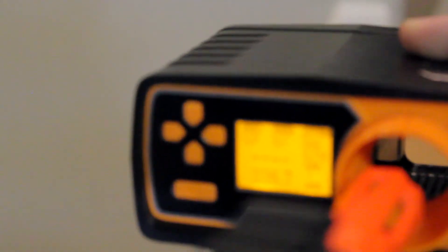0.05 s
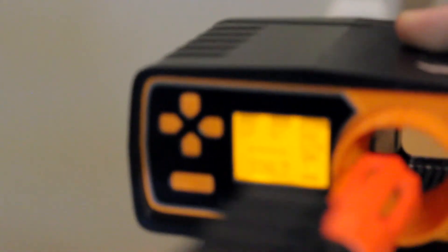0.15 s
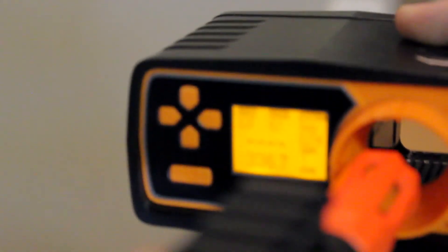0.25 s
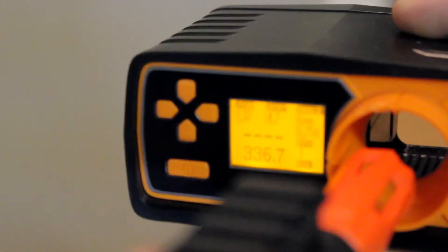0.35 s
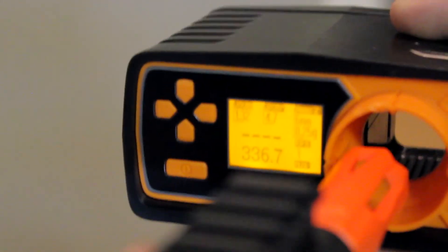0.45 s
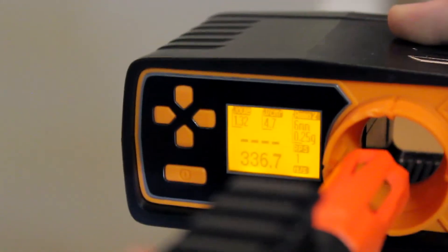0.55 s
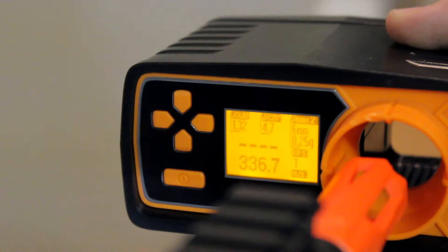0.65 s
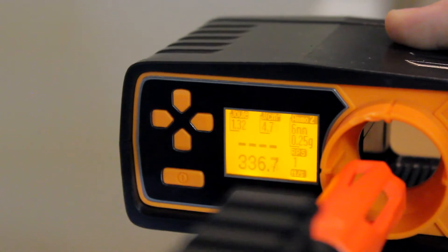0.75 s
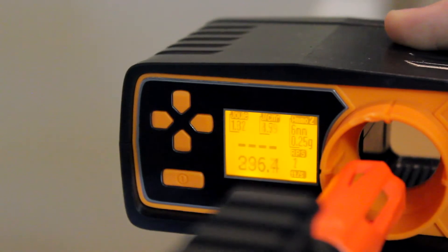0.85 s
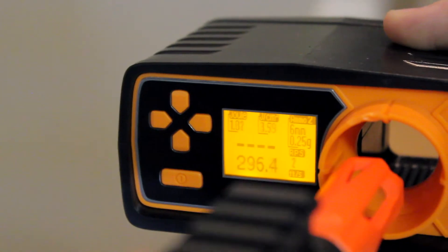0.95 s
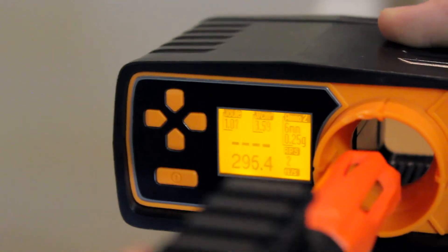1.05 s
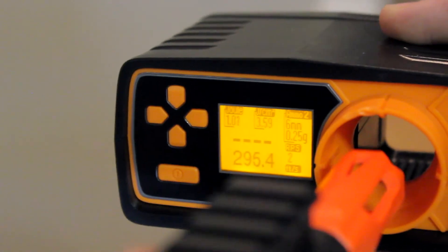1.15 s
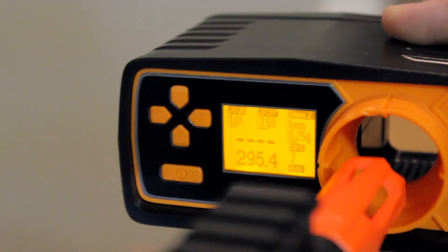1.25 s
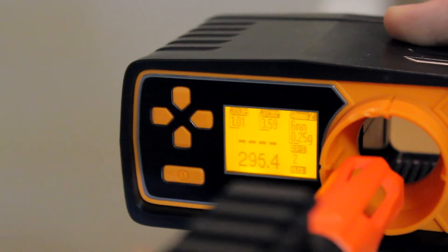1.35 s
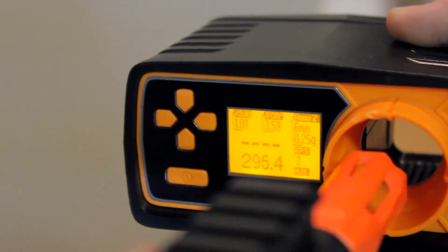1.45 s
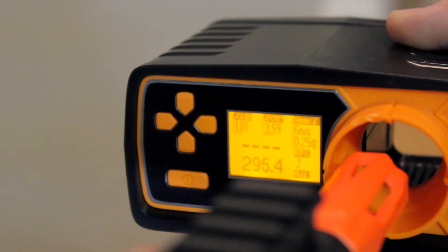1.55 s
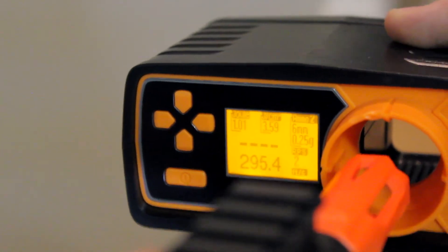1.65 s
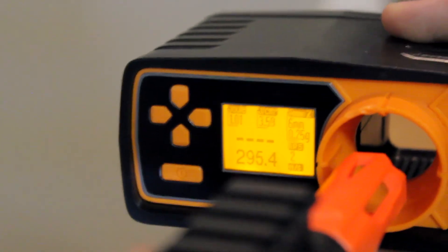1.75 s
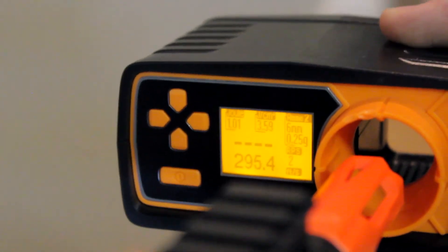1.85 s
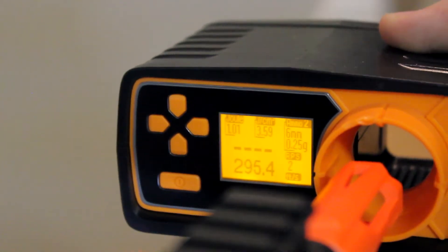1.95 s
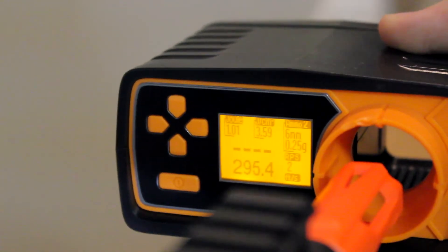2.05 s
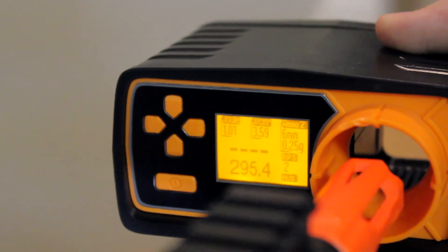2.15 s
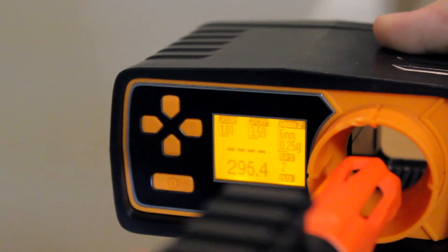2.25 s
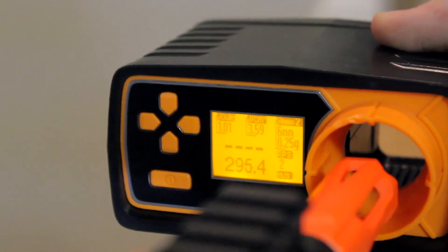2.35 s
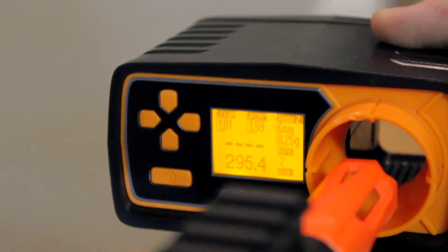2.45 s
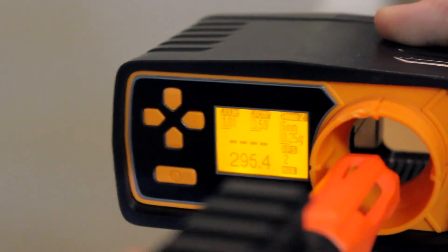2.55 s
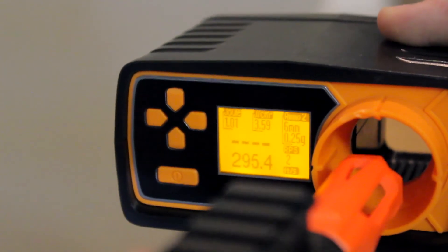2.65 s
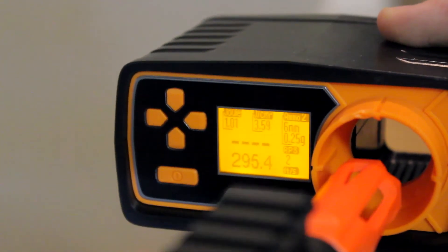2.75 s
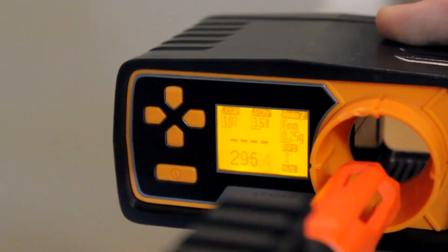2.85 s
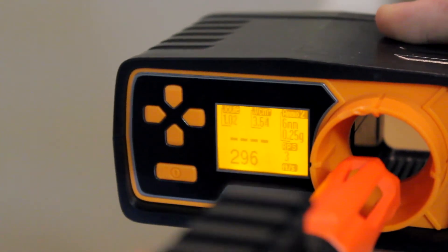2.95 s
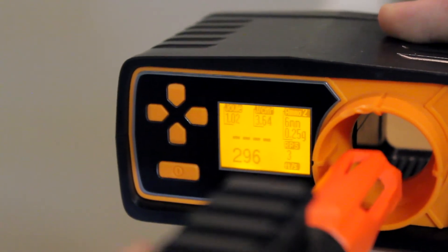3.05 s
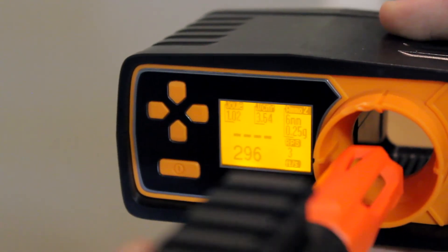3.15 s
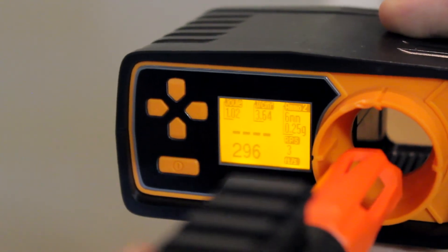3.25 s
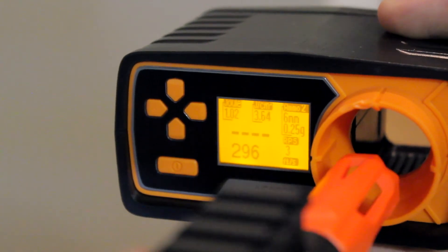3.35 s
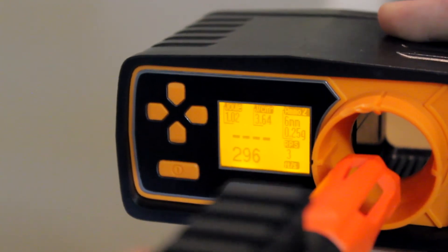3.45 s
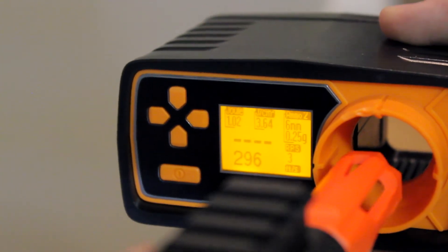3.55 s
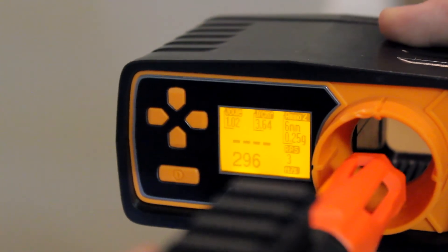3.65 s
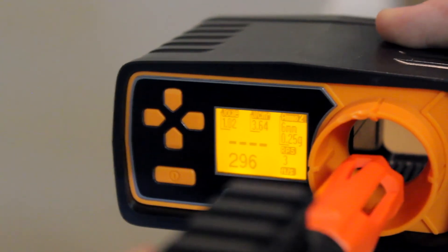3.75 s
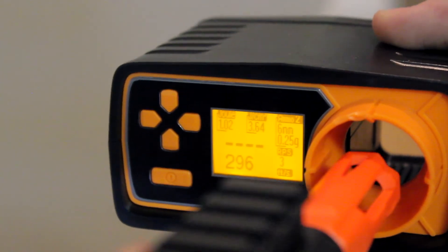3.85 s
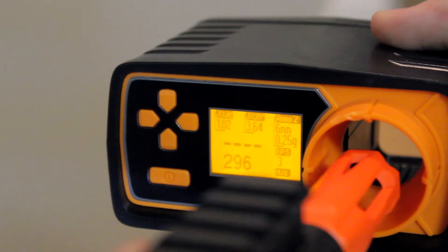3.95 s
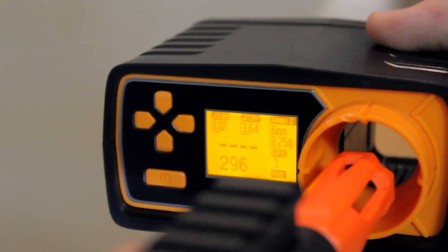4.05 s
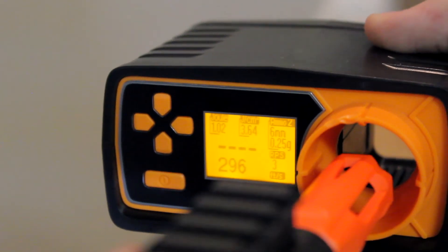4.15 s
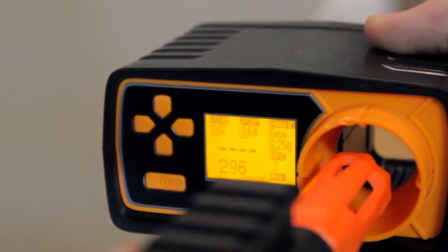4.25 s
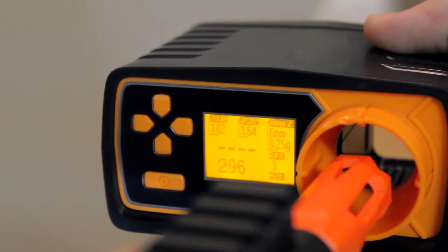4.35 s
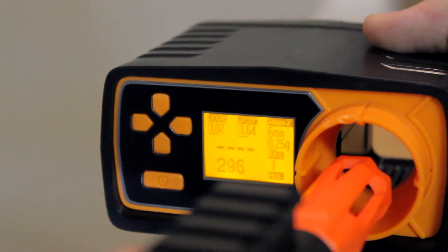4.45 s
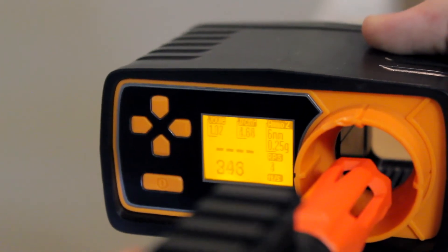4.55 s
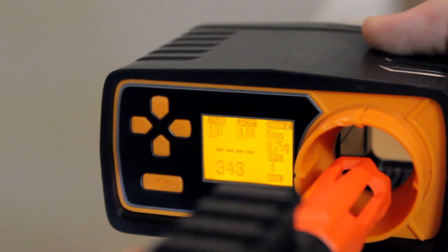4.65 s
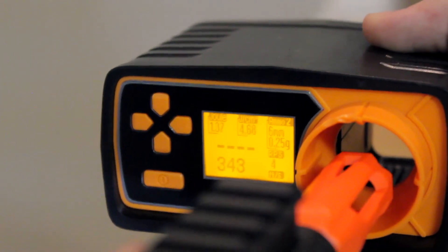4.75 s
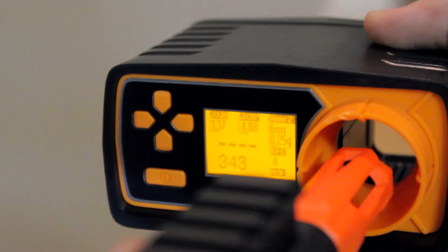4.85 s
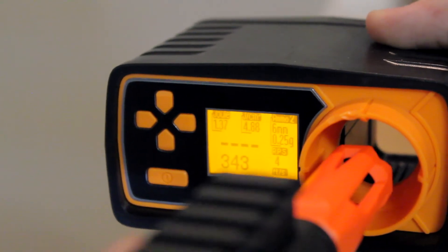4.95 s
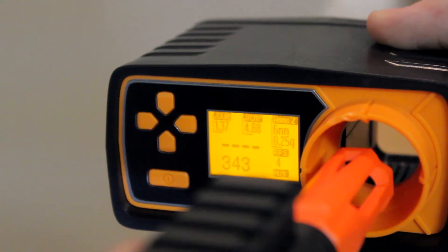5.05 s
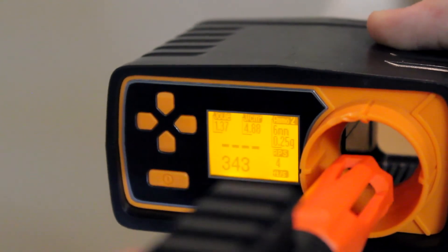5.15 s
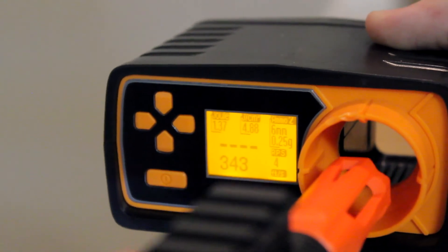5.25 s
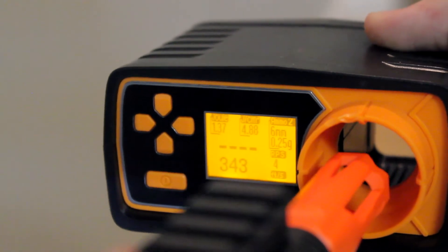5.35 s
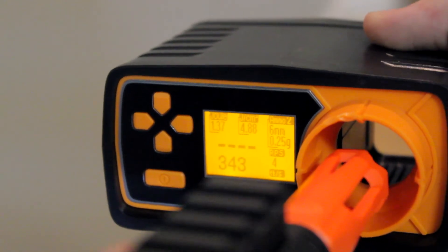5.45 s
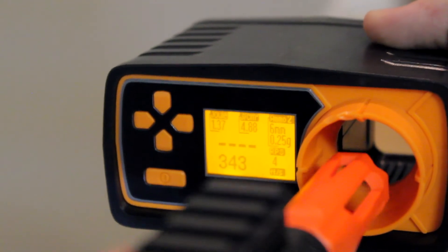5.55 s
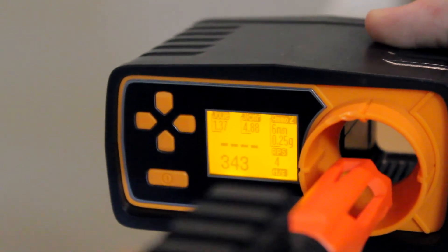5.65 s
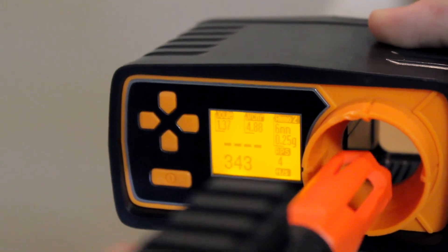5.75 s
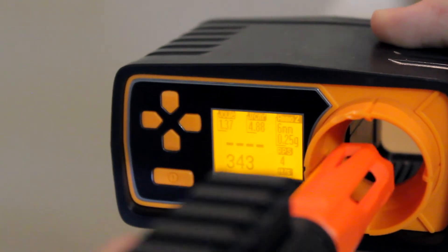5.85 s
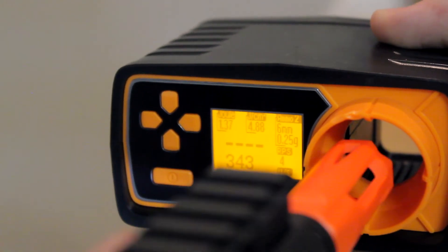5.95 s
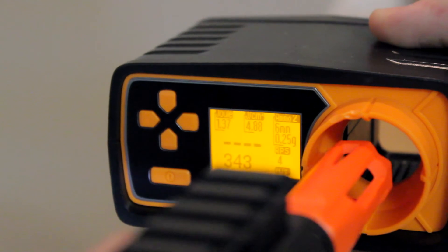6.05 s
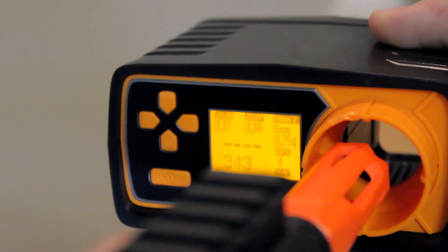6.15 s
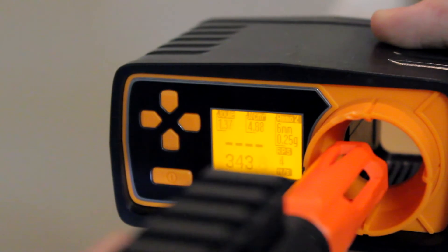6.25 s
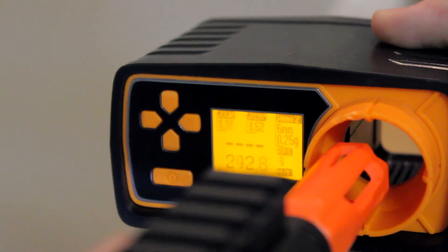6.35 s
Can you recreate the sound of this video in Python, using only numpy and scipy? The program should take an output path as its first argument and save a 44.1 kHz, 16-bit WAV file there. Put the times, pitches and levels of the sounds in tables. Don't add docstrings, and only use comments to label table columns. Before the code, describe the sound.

Quiet hiss and low hum open the scene, with barely audible hand movement. At about 0.62 s an electric toy rifle, close and right of centre, fires: a rapid gear whine, a thump and hard metallic-plastic piston clack at 0.66, a pellet smacking a target at 0.70, then clattering gears coasting down until about 0.9. A softer knock falls at 0.79. The loose pellet bounces at 1.2, 1.5, strongly at 1.73 with a glancing scrape, then fainter at 1.95 and 2.3. The second shot comes at 2.6, its hit at 2.69, with a faint knock at 2.89. Light rustling follows around 3.1 to 3.4. The third shot cracks at 4.4, again with a quick hit and a faint later knock. Hands rustle from 4.9 to 6.0, with a tiny tap at 5.72. The fourth shot fires at 6.2, hits at 6.25, and its gears are running down as it ends. Room echo is short, about half a second.

```python
import sys
import numpy as np
from scipy import signal
from scipy.fft import rfft, irfft
from scipy.io import wavfile
from scipy.ndimage import uniform_filter1d

SR = 44100
rng = np.random.default_rng(int(sys.argv[2]) if len(sys.argv) > 2 else 0)


def dump_mix(stems):
    frames = np.atleast_2d(stems).T
    limited = np.clip(frames, -1, 1)
    pcm = np.round(limited * 32767).astype(np.int16)
    wavfile.write(sys.argv[1], SR, pcm)


def magnitude_from_level(level_db):
    exponent = np.asarray(level_db, float) / 20
    return 10 ** exponent


N = 282323

# f/Hz, density/dB
HISS_MID = [(40, -45.5), (70, -14.5), (123, -6), (150, -15), (300, -15.5), (420, -18), (540, -17),
            (700, -18.5), (1500, -22.5), (3000, -25.5), (6000, -27.5), (10000, -32.5), (13000, -36),
            (15600, -40)]
HISS_SIDE = [(18, -41.5), (30, -8), (95, -5), (140, -4.5), (263, -4), (623, -6.5), (674, -6), (1260, -9),
             (1560, -11), (3160, -13), (15600, -29)]
HISS_MID_DB, HISS_SIDE_DB = -60, -56.5
# f/Hz, level/dB, waver/dB
HUM = [(39.5, -71.5, 0.92), (125.54, -68.5, 0.5), (546, -73.5, 1.5), (714.6, -80, 4)]

# loudest t/s, fade per 20 dB/s, scratch
# level/dB, bump level/dB
HANDS = [(0.004, 0.0781, -62, -48), (0.27, 0.47, -66.5, -79), (1.06, 0.13, -58, -58),
         (1.166, .05, -68, -59), (2.41, 0.01, -68, -56), (3.1, 0.1446, -59, -58), (3.24, 0.0036, -60, -62),
         (3.413, .03, -57, -63), (3.67, 0.09, -68, -60), (4.9, 0.1952, -60, -68), (4.99, .16, -56, -64),
         (5.11, 0.13, -66, -58), (5.352, 0.1365, -51, -54), (5.715, .06, -61, -53), (5.978, .1, -65, -59)]
HAND_RISE = .45
# t/s, peak level/dB
TAP = [
    (5.7164, -50.5),
]

# f/Hz, width/Hz, level/dB
CASE = [(1250, 16.4, 6.5), (1663, 49, -11.5), (2604, 94, -3)]
RING = [(1965, 490, -2.5), (2613, 130, 1), (3067, 490, -3.5), (3963, 230, 2), (4237, 370, -2.5),
        (5524, 1400, -10)]
SHELL = [(538, 170, -2), (883, 89, -2.5), (1029.4, 68, 0.32), (1326, 220, 1.5), (1511, 460, -3)]
STOCK = [(117, 78, -11.5), (160.4, 25, -3), (237.95, 34, -3), (338.2, 49, 3), (392, 69, 3.5),
         (527, 140, -4.5)]
AIR = [(6580, 1200, 3.5), (8564, 5900, -2.5), (10813, 2400, -9.5), (12080, 4300, -17)]
# low f/Hz, high f/Hz
PART_EDGES = [
    (1620, 12000),
    (451, 2000),
    (70, 380),
    (4970, 13500),
]

# trigger t/s, piston home t/s, power cut t/s, winding level/dB, coasting level/dB
SHOTS = [
    (0.622, 0.658, 0.817, -15, -31),
    (2.583, 2.648, 2.8182, -15.5, -33),
    (4.357, 4.396, 4.5566, -17, -31),
    (6.142, 6.206, 6.385, -15.5, -31),
]
STAGE = {"bite": (4, -19.5, -16.5), "wind": (-10.5, -30, -13), "load": (-9.5, -10.5, -10.5),
         "recoil": (-4.5, -11, -8.5), "settle": (-10, -11, -10), "coast": (-.5, .8, -10.5),
         "rundown": (-5.5, -10, -10)}
MESH_START_HZ, MESH_TOP_HZ, SPIN_UP_S = 500, 2560, .026
TOUCH_DB, BITE_S, BITE_DB, WIND_UP_S = -47, .010, -25.5, .03
LOAD_S, LOAD_DB = 0.0063, -1.5
RECOIL_S, RECOIL_DB, SETTLE_S, SETTLE_DB, FREE_S = 0.0076, 11.5, .028, 5, .055
SURGE_DB, RUNDOWN_S, RUNDOWN_DB = 2.5, .12, -19
STROKE_S, STROKE_DB = .007, 1.6

# 4 kHz level/dB, 5.5 kHz level/dB
TUBE = [(.4, -.5), (.4, -.5), (-6, 3), (1.5, -.5)]
# low f/Hz, high f/Hz
TUBE_BANDS = [(3550, 4700), (5000, 6300)]
PORT_LAG_S = .00003

# f/Hz, T60/s
ROOM_T60 = [(100, 0.17), (400, 0.54), (1500, 0.399), (4000, 0.381), (7000, 0.4), (10000, 0.21),
            (15000, 0.16)]
# f/Hz, side minus mid level/dB
ROOM_SIDE = [(100, -10), (400, -9.5), (1500, -5), (4000, -5.5), (9000, 1.5), (15000, 4.5)]

# t/s, peak level/dB
RELEASE = [
    (0.654, -10),
    (2.643, -15),
    (4.391, -13.5),
    (6.202, -15.5),
]
# t/s, ring peak level/dB, knock rel/dB, thud rel/dB, left minus right/dB
SLAMS = [(0.6592, -7, -5, -17.5, -6.5), (0.6624, -2, -9, -30, -10), (2.6484, -2, -7, -23, -9.5),
         (4.3914, -12, -10, -21, -4), (4.3993, -3.5, -6, -17.5, -6.5), (4.3966, -3, -5, -28, -12.5),
         (6.208, -5, -10, -17, -12)]
SLAM_SNAP_DB = -14.5
SPRING_HZ, SPRING_T60_S, SPRING_DB = 1028, 1.3, [-46, -57, -43, -50]

# t/s, peak level/dB, knock f/Hz, tick rel/dB, snap rel/dB
TARGET = [
    (0.7022, -6, 1212, -3, -22),
    (2.689, -7, 1384, -4.5, -24.5),
    (4.4348, -6.5, 1373, -.5, -21),
    (6.2497, -4.5, 1430, -3, -24),
]
FAR = [
    (0.789, -17, 1314, -6, -16),
    (2.886, -28, 1039, 2.5, -4),
    (4.675, -30, 1116, 4.5, -4),
]
SHELF = [(1.1958, -19.5, 4500, -.5, -19), (1.1962, -27, 1600, -20, -25), (1.197, -30, 800, -20, -25)]
PELLET = [(1.497, -21.5, 1350, -4, -24), (1.7265, -12, 1300, 5.5, -14), (1.9532, -24, 1100, -10, -30),
          (2.3228, -39, 900, -29, -35), (2.362, -48, 550, -30, -35), (3.409, -46, 1237, -2, -5)]
SKIMS = [(1.7262, -22, 500, -3, 7), (1.7422, -26, 500, -3, 15)]
# delay t/s, level/dB
TARGET_PATHS = [(0, -3), (.0022, 0)]
SHELF_PATHS = [(0, -13), (.0028, 0), (.0062, -6), (.0085, -6), (.016, -7)]
FLOOR_PATHS = [(0, -11), (.0025, -4), (.0038, -9), (.0052, 0), (.008, -8)]
SKIM_PATHS = [(0, 0), (.0014, -6), (.003, -4)]


def unit(x):
    return x / np.sqrt(np.mean(x ** 2))


def on_log(table, hz):
    f, v = np.transpose(table)
    return np.interp(np.log(np.maximum(hz, 1)), np.log(f), v)


def coloured(table):
    hz = np.fft.rfftfreq(N, 1 / SR)
    return unit(irfft(rfft(rng.standard_normal(N)) * magnitude_from_level(on_log(table, hz)), N))


def band(x, low_hz, high_hz, order=2):
    return signal.sosfilt(signal.butter(order, [low_hz, high_hz], "band", fs=SR, output="sos"), x)


def pan(db):
    return magnitude_from_level(np.array([[db], [-db]]) / 2)


def resonate(x, modes):
    def bank(v):
        total = 0
        for k, (hz, width, db) in enumerate(modes):
            total = total + (-1) ** k * magnitude_from_level(db) * signal.lfilter(*signal.iirpeak(hz, hz / width, SR), v)
        return total
    return bank(x) / np.sqrt(np.sum(bank(signal.unit_impulse(8192)) ** 2))


def held(shape, samples):
    return np.repeat(rng.exponential(size=shape), samples, axis=-1)[..., :N]


def swell(t, peak_s):
    return (t / peak_s * np.exp(1 - t / peak_s)) ** 2


def floor():
    t = np.arange(N) / SR
    waver = uniform_filter1d(rng.standard_normal((len(HUM), N)), size=3000)
    hum = 0
    for (hz, db, depth), w in zip(HUM, waver):
        drift = depth * unit(w)
        phase = 2 * np.pi * hz * t + 0.39 * drift[::-1]
        hum = hum + np.sqrt(2) * magnitude_from_level(db + drift) * np.sin(phase)
    mid = magnitude_from_level(HISS_MID_DB) * coloured(HISS_MID) + hum
    side = magnitude_from_level(HISS_SIDE_DB) * coloured(HISS_SIDE)
    return pan(-1.5) * (mid + side * np.array([[1], [-1]]))


def touches():
    t = np.arange(0, N + 63, 64) / SR
    both = 0
    for s, fade, scratch, bump in HANDS:
        away = np.where(t > s, t - s, (s - t) / HAND_RISE)
        both = both + magnitude_from_level(np.array([[scratch], [bump]]) - 20 * away / fade)
    return [np.interp(np.arange(N) / SR, t, gain) for gain in both]


def hands():
    scratch, bump = touches()
    grains = unit(rng.standard_normal((2, N)) * magnitude_from_level(held(N // 80 + 1, 80)))
    cloth = resonate(scratch * grains, [(1300, 430, -1.8), (3150, 1500, 0.42)])
    tap = sum(magnitude_from_level(db + 25.5) * resonate(signal.unit_impulse(N, int(s * SR)), CASE) for s, db in TAP)
    grip = resonate(bump * grains[0], STOCK[:3])
    return band(cloth, 600, 9300) + pan(-4.5) * (grip + band(tap, 880, 3750))


def parts(drive):
    bodies = (RING, SHELL, STOCK, AIR)
    return [band(resonate(d, modes), *edges) for d, modes, edges in zip(drive, bodies, PART_EDGES)]


def cycle(trigger, home, cut, wind_db, coast_db):
    t = np.arange(N) / SR
    wound = trigger + WIND_UP_S
    steps = [(trigger, TOUCH_DB, "bite"),
             (trigger + BITE_S, BITE_DB, "bite"),
             (wound, wind_db, "wind"),
             (max(home - LOAD_S, wound + 1 / SR), wind_db + LOAD_DB, "load"),
             (home + RECOIL_S, coast_db + RECOIL_DB, "recoil"),
             (home + SETTLE_S, coast_db + SETTLE_DB, "settle"),
             (home + FREE_S, coast_db, "coast"),
             (cut, coast_db + SURGE_DB, "coast"),
             (cut + RUNDOWN_S, coast_db + RUNDOWN_DB, "rundown")]
    s = [step[0] for step in steps]
    db = np.array([level + np.array([0, *STAGE[stage]]) for _, level, stage in steps]).T
    running = (t > s[0]) & (t < s[-1])
    effort = np.zeros((len(db), N))
    effort[:, running] = [magnitude_from_level(np.interp(t[running], s, column)) for column in db]
    loaded = effort[0] * (t > s[1]) * (t < s[3])
    return np.vstack([effort, loaded])


def gearbox():
    *effort, loaded = sum(cycle(*shot) for shot in SHOTS)
    t, mesh_hz = np.arange(N) / SR, np.zeros(N)
    for trigger, *_ in SHOTS:
        since = np.maximum(t - trigger, 0)
        spinning_hz = MESH_TOP_HZ - (MESH_TOP_HZ - MESH_START_HZ) * np.exp(-since / SPIN_UP_S)
        mesh_hz = np.where(since > 0, spinning_hz, mesh_hz)
    wobble = uniform_filter1d(rng.standard_normal((2, N)), size=90)
    phase = 2 * np.pi * np.cumsum(mesh_hz * (1 + .3 * wobble[0])) / SR
    whine = np.sin(phase) * (1 + 4.0 * wobble[1])
    clatter = unit(rng.standard_normal((4, N)) * magnitude_from_level(1.9 * held(N // 60 + 1, 60)))
    strokes = magnitude_from_level(STROKE_DB * held((3, N // 200), int(STROKE_S * SR))[[0, 1, 1, 2]])
    clatter = unit(clatter * strokes)
    shaken = parts(np.array(effort) * clatter)
    body = sum(pan(db) * part for db, part in zip([-5.5, -5.5, -5.0, -2.0], shaken))
    return body + pan(-4) * magnitude_from_level(-7) * uniform_filter1d(loaded, size=500) * whine


def tube(x):
    triggers = [s[0] for s in SHOTS]
    shot = np.clip(np.searchsorted(triggers, np.arange(N) / SR) - 1, 0, None)
    bands = zip(np.transpose(TUBE), TUBE_BANDS)
    return x + sum((magnitude_from_level(db[shot]) - 1) * band(x, *edges, order=1) for db, edges in bands)


def ports(x):
    hz = np.fft.rfftfreq(N, 1 / SR)
    return np.array([irfft(rfft(x[0]) * np.exp(-2j * np.pi * hz * PORT_LAG_S), N), x[1]])


def room(dry):
    t = np.arange(int(.7 * SR)) / SR
    echo = 0
    for hz in 100 * 2. ** np.arange(0, 7.6, .5):
        mid, side = band(rng.standard_normal((2, len(t))), hz / 1.19, min(hz * 1.19, 20000))
        fade = np.exp(-np.log(1000) * t / np.clip(on_log(ROOM_T60, hz), .05, 2))
        echo = echo + fade * (mid + magnitude_from_level(on_log(ROOM_SIDE, hz)) * side * np.array([[1], [-1]]))
    echo = echo * (1 - np.exp(-(t / 0.00075) ** 2)) * (1 + 0.46 * np.exp(-t / 0.029))
    return pan(-2.7) * signal.fftconvolve(dry.mean(axis=0, keepdims=True), echo, axes=1)[:, :N]


def piston(peak_s):
    t = np.arange(4000) / SR
    out = np.zeros((2, N + len(t)))
    thump = band(resonate(swell(t, 0.00052), STOCK + [(101.7, 45, -2), (516.0, 130, 8)]), 79, 720)
    for s, db in RELEASE:
        out[:, int(s * SR):][:, :len(t)] += pan(-5) * magnitude_from_level(db) * thump / np.abs(thump).max()
    lift_db = np.array([1.5, 0.66, 1.2, 5.7])
    for s, db, knock, thud, side_db in SLAMS:
        gains = magnitude_from_level(db + lift_db + np.array([0, knock, thud, SLAM_SNAP_DB]))
        blow = rng.standard_normal(len(t)) * swell(t, peak_s)
        rings = parts(np.tile(blow, (4, 1)))
        slam = sum(g * v / np.abs(v).max() for g, v in zip(gains, rings))
        out[:, int(s * SR):][:, :len(t)] += pan(side_db) * slam
    return out[:, :N]


def spring():
    t, kicks = np.arange(N) / SR, np.zeros(N)
    kicks[[int(s[1] * SR) for s in SHOTS]] = magnitude_from_level(np.array(SPRING_DB))
    ringing = signal.lfilter([1], [1, -magnitude_from_level(-60 / SPRING_T60_S / SR)], kicks)
    return ringing * np.sin(2 * np.pi * SPRING_HZ * t)


def pellet(table, paths, peak_s, thud_db):
    t = np.arange(3000) / SR
    out = np.zeros((2, N + len(t)))
    for s, db, hz, tick, snap in table:
        blow = (.7 + rng.standard_normal(len(t))) * swell(t, peak_s)
        arrivals = sum(magnitude_from_level(g) * np.roll(blow, int(late * SR)) for late, g in paths)
        click = np.array([arrivals, signal.unit_impulse(len(t))])
        layers = [band(click, hz / 1.45, hz * 1.45),
                  band(click, 2500, 4700),
                  band(click, 6200, 13000),
                  band(resonate(click, STOCK), 110, 570)]
        sized = []
        for v, rel in zip(layers, (0, tick, snap, thud_db)):
            match = np.sqrt(np.sum(v[0] ** 2) / np.sum(v ** 2, axis=1, keepdims=True))
            sized.append(magnitude_from_level(db + rel) * v * match / np.abs(v[0]).max())
        power = sum(np.abs(rfft(v[1])) ** 2 for v in sized[:3])
        even = np.roll(irfft(np.sqrt(power), len(t)), 90) + sized[3][1]
        out[:, int(s * SR):][:, :len(t)] += [sum(v[0] for v in sized), even]
    return out[:, :N]


def scene():
    gun = tube(gearbox()) + pan(-5.) * spring()
    slams = tube(piston(peak_s=0.00086))
    target = pellet(TARGET, TARGET_PATHS, peak_s=.00025, thud_db=-14)
    far = pellet(FAR, TARGET_PATHS, peak_s=0.0038, thud_db=-15)
    bead = pellet(SHELF, SHELF_PATHS, peak_s=.0006, thud_db=-28)
    bead = bead + pellet(PELLET, FLOOR_PATHS, peak_s=.00015, thud_db=-23)
    skim = pellet(SKIMS, SKIM_PATHS, peak_s=.0004, thud_db=-13)
    near = gun + slams + pan(-7) * target[0]
    near = near + pan(-4.5) * (bead[0] + skim[0] + magnitude_from_level(-10.5) * far[0])
    sent = magnitude_from_level(-38.5) * gun + magnitude_from_level(-48.0) * slams + magnitude_from_level(-39) * target[1]
    sent = sent + magnitude_from_level(-34) * bead[1] + magnitude_from_level(-36.5) * skim[1] + magnitude_from_level(-30.0) * far[1]
    return ports(near) + room(sent) + hands() + floor()


def band_limit(x):
    return signal.sosfilt(signal.butter(12, 15710, fs=SR, output="sos"), x)


def record(dry):
    mix = np.clip(dry, -.98, .98)
    return band_limit(mix)


dry = scene()
out = record(dry)
dump_mix(out)
```